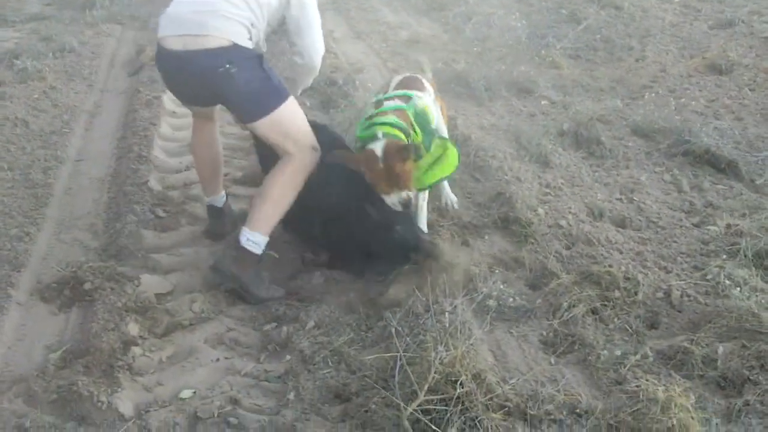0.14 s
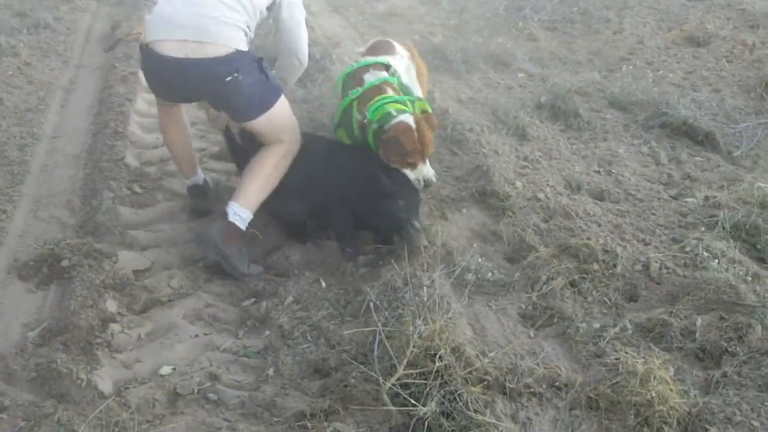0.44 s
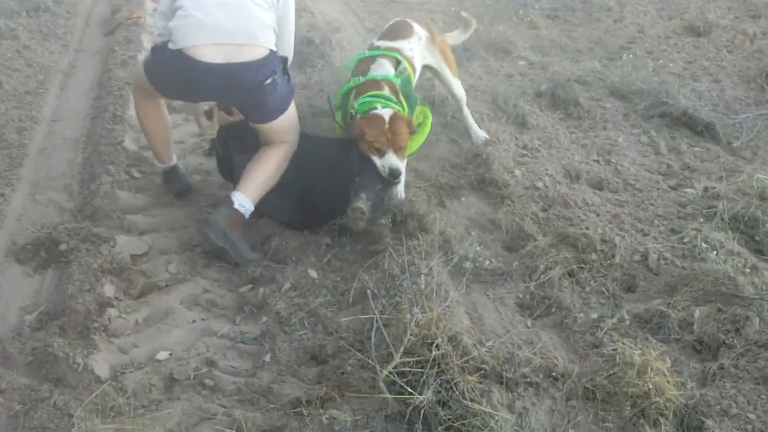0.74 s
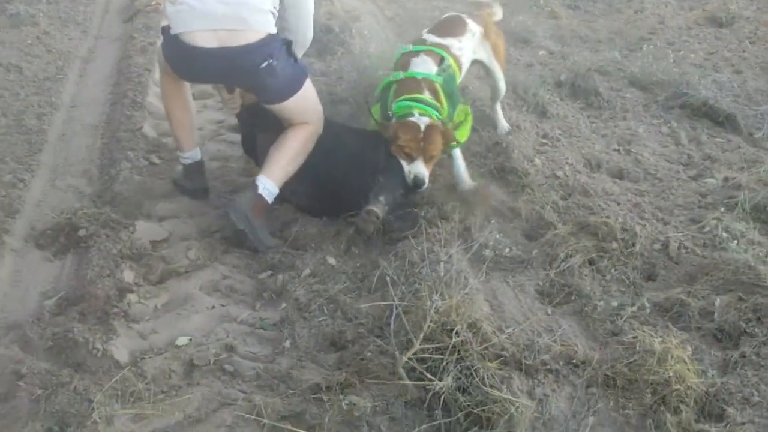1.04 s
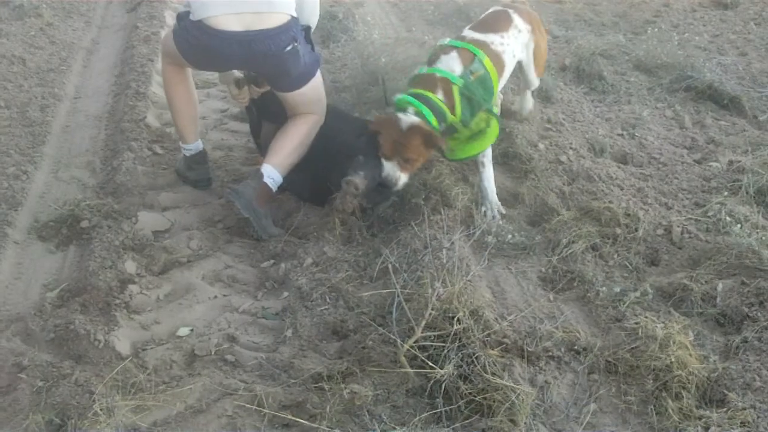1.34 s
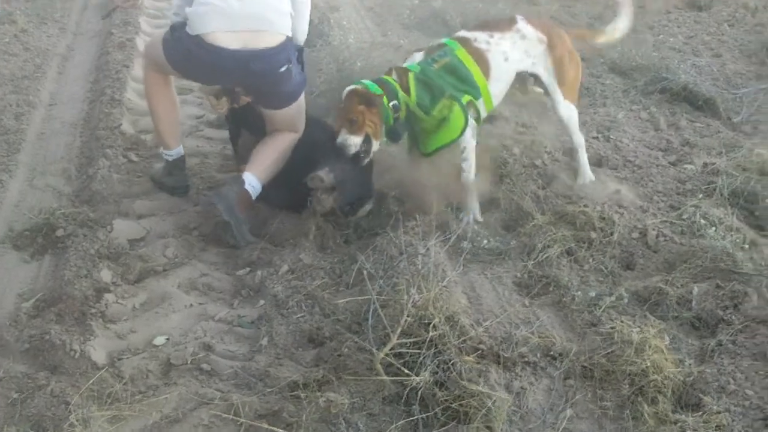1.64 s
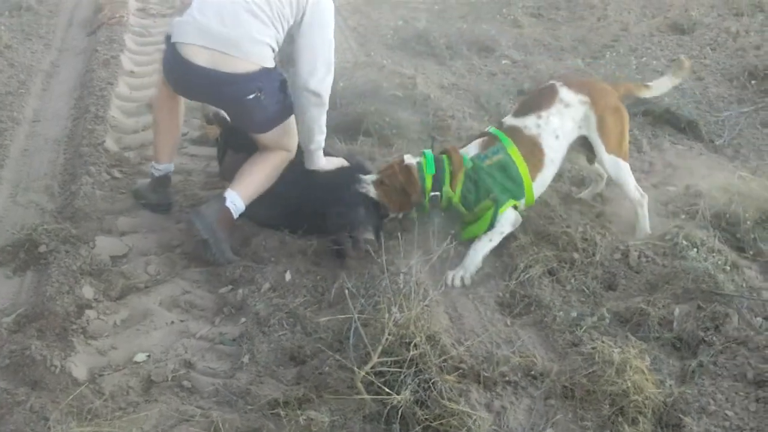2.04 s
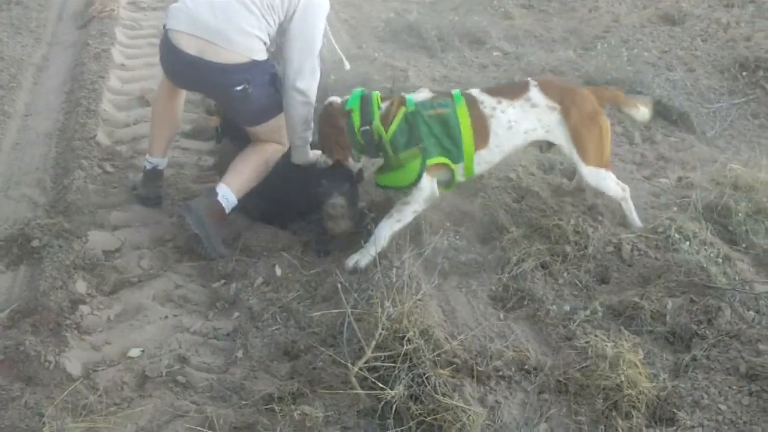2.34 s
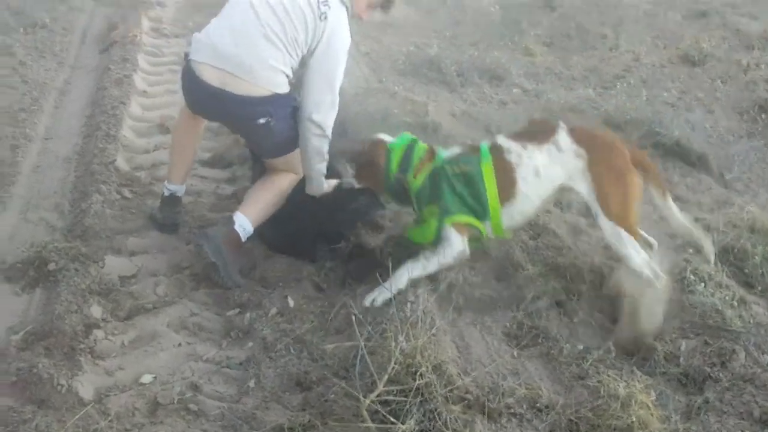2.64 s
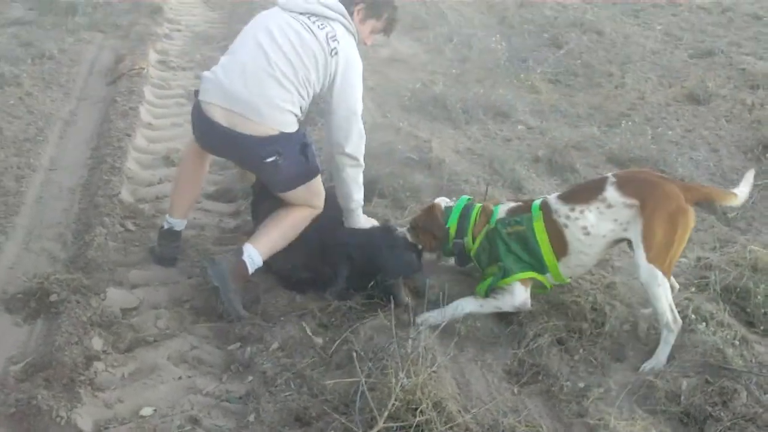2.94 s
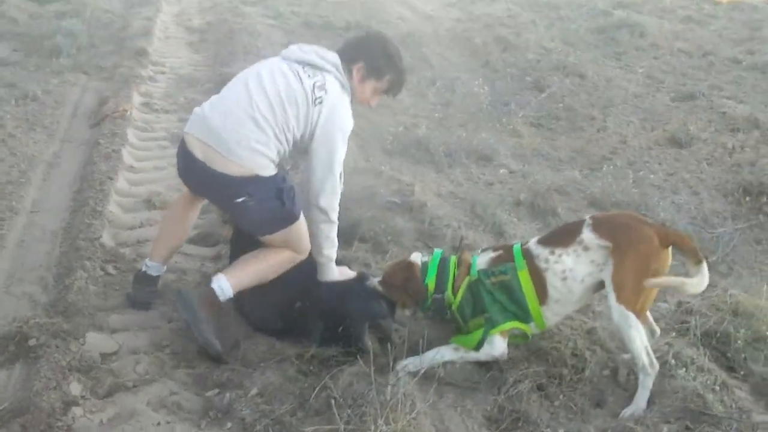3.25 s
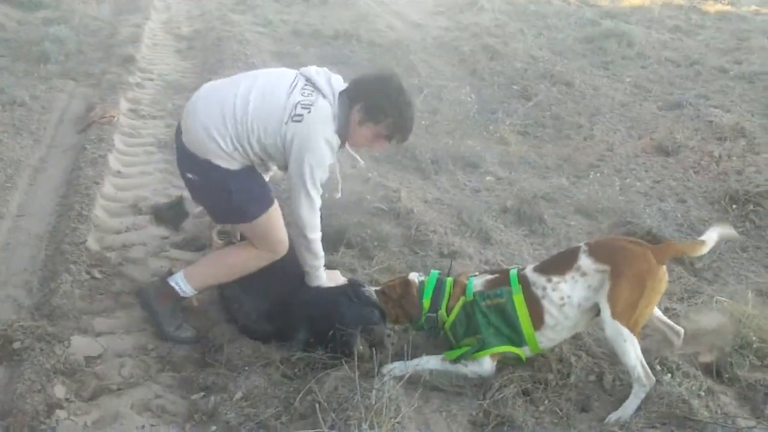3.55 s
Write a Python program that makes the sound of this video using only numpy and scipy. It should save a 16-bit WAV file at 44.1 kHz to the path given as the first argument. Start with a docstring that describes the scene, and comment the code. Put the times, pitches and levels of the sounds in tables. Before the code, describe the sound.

A pig squeals twice, loud and close, in a quiet open field. Feet briefly scuff dry grass at the start. At 0.2 seconds the first cry climbs quickly to a shrill, raspy pitch, holds, and drops away at 1.5. Faint scrapes on soil fill the pause. The second squeal runs from about 2 to 3.5 seconds, rising, wavering and falling at the end. Both cries echo faintly.

```python
"""Feet scuff dry grass, then a pig held down in an open field squeals twice, close to the microphone.
Two things vibrate in its throat at once: a high whistle and the slower vocal folds, which chop it
into sidebands and puffs of breath noise. The ground reflects the voice as the head moves.
Dull scrapes on soil follow each cry, and the field echoes faintly over quiet outdoor air."""
import sys
import numpy as np
from scipy import signal
from scipy.fft import rfft, irfft, next_fast_len
from scipy.io import wavfile
from scipy.ndimage import uniform_filter1d, minimum_filter1d, map_coordinates

SR = 44100
rng = np.random.default_rng(int(sys.argv[2]) if len(sys.argv) > 2 else 0)


def transcribe(u):
    """Save the signal u as a 16-bit wav file named by the first command-line argument.

    u: samples, shape (n,) or (channels, n), limited to [-1, 1]; the rate is SR.
    q: integer samples, one column per channel.
    """
    v = np.clip(np.atleast_2d(u).T, -1, 1)
    q = np.round(v * 32767).astype(np.int16)
    wavfile.write(sys.argv[1], SR, q)


N = 163170
T = np.arange(N) / SR


def amp(db):
    return 10 ** (np.asarray(db) / 20)


def unit(x):
    return x / np.sqrt(np.mean(x ** 2) + 1e-20)


def along(points, hz):
    """Read (frequency, value) points on a log axis."""
    freqs, values = np.transpose(points)
    return np.interp(np.log(hz + 1), np.log(freqs + 1), values)


def curves(rows):
    """One value per sample for each column after the time."""
    times, *columns = np.transpose(rows)
    return [np.interp(T, times, column) for column in columns]


def wobble(rate):
    """A smooth random curve, rate knots a second."""
    return map_coordinates(rng.standard_normal(int(N * 2000 / SR)), [T * rate])


def filtered(x, response):
    """Apply a gain that depends on frequency."""
    size = next_fast_len(N + SR // 2)
    return irfft(rfft(x, size) * response(np.fft.rfftfreq(size, 1 / SR)), size)[..., :N]


def highpass(x, edge_hz):
    return filtered(x, lambda hz: 1 / (1 + (edge_hz / (hz + 1)) ** 10))


def coloured(x, spectrum):
    return unit(filtered(x, lambda hz: amp(along(spectrum, hz))))


def phasor(hz):
    return np.exp(2j * np.pi * np.cumsum(hz) / SR)


def harmonics(tone, fall_db, count):
    return sum(amp(fall_db * k) * tone ** (k + 1) for k in range(count))


def phase_blur(radians):
    return np.exp(1j * radians * wobble(350))


# Open field, all around the microphone: (frequency [Hz], relative level [dB])
AIR_SPECTRUM = [(35, -50.5), (60, -12.5), (196, 7), (624, -27), (769, -5.5), (904, -15.5), (2130, -12),
                (3550, -19), (15300, -27.5)]
def field_air():
    """Quiet outdoor air, its level wavering."""
    return amp(-64.5 + 3.3 * wobble(4.7)) * coloured(rng.standard_normal(N), AIR_SPECTRUM)


# The field farther off, then grass and bodies close by: (frequency [Hz], time to fall 60 dB [s])
FAR_DECAY = [(500, .5), (2200, 0.5), (5000, 0.3), (12000, 0.12)]
NEAR_DECAY = [(500, 0.1), (3000, 0.28), (6000, 0.11), (12000, 0.12)]
def echo(x, decay):
    """Scattered answer of the surroundings, each frequency dying at its own speed."""
    hz, t, noise = signal.stft(rng.standard_normal(SR), SR, nperseg=256)
    tail = signal.istft(noise * amp(-60 * t / along(decay, hz)[:, None]), SR, nperseg=256)[1]
    return signal.fftconvolve(x, tail / np.linalg.norm(tail))[:N]


# Feet in dry grass and on soil: (time [s], length [s], level [dB])
GRASS_SCUFFS = [(0, 0.093, -42.5), (0.056, 0.061, -44.5), (0.1, 0.011, -46), (0.105, 0.076, -48.5),
                (0.162, 0.08, -39.5)]
SOIL_SCUFFS = [(1.748, 0.038, -59.5), (1.885, .02, -63.5), (3.59, 0.022, -74)]
# Colour of each surface: (frequency [Hz], relative level [dB])
GRASS_SPECTRUM = [(71, -53), (120, 8), (580, -10.5), (981, -6.5), (1150, 2.5), (1500, -5), (2800, 3),
                  (5570, -4.5), (15000, -21.5)]
SOIL_SPECTRUM = [(240, -57), (400, -29), (1120, 2), (1780, -5), (3970, -24), (8000, -47), (10400, -77),
                 (17600, -120)]
def feet(scuffs, surface):
    """Crackly scrapes underfoot, each swelling and fading."""
    swell = sum(amp(db) * np.sin(np.pi * np.clip((T - start) / length, 0, 1)) ** 0.7
                for start, length, db in scuffs)
    crackle = amp(2.2 * wobble(340)) * rng.standard_normal(N)
    return swell * coloured(crackle, surface)


# Ground between pig and microphone: (time [s], notch spacing [Hz], reflection [dB, capped at 0])
GROUND_PATH = [(.2, 2000, -28.5), (.34, 1944, -13.5), (.41, 2962, -1.5), (.55, 3800, -18.5), (.62, 5130, 7),
               (.72, 7010, 1.5), (.9, 5580, -19), (1.35, 7260, 2), (2.0, 1600, -23.5), (2.06, 2160, 2),
               (2.13, 3574, -1), (2.2, 5000, -7), (2.28, 4400, -17), (2.38, 4730, -19.5), (2.55, 6450, -3),
               (2.65, 6144, -2.5), (2.78, 5890, -7.5), (2.87, 4670, 8.5), (2.93, 3260, -5.5),
               (3.15, 3200, 1.5), (3.35, 3240, -7.5)]
def ground_bounce(direct, scatter_hz=7070):
    """A late copy cuts notches that shift as the head moves; rough ground dulls that copy."""
    spacing_hz, ground_db = curves(GROUND_PATH)
    gain = amp(np.minimum(ground_db, 0))
    late = map_coordinates(direct, [np.arange(N) - SR / spacing_hz], order=3)
    late = filtered(late, lambda hz: 1 / (1 + (hz / scatter_hz) ** 2))
    return (direct + gain * late) / np.sqrt(1 + gain ** 2)


def puffs(folds, depth=0.19):
    """Breath noise gated by the vocal folds."""
    return (1 + depth * folds.real) * rng.standard_normal(N)


# Rasp at close range: (frequency [Hz], relative level [dB])
RASP_SPECTRUM = [(300, -59), (420, -34), (600, -9), (900, -11.5), (1250, -7.5), (1600, 11.5), (2300, 11.5),
                 (2800, 10.5), (3300, 4.5), (4200, -29)]
# Breath in the lowest throat resonance, per cry: (time [s], level [dB])
THROAT_LEVELS = [
    [(0.225, -21), (0.247, -23.5), (0.367, -44), (0.493, -46), (0.515, -38), (1.147, -45), (1.161, -41),
     (1.297, -48), (1.393, -36.5), (1.449, -48), (1.519, -41), (1.545, -76)],
    [(1.962, -36), (2.004, -34), (2.092, -57), (2.224, -68.5), (2.258, -41), (2.566, -51), (2.8, -41),
     (2.894, -53), (3.08, -37), (3.106, -45), (3.412, -39), (3.49, -68)],
]
def breath(index, folds, rough, rasp_db, throat_hz=913, width_hz=88):
    """Puffs make a broad rasp, thinner when the folds are steady, and ring the throat."""
    gain = amp(uniform_filter1d(rasp_db, size=2000)) * np.sqrt(2200 / 75)
    rasp = gain * np.clip(rough / .2, .35, 1) * coloured(puffs(folds), RASP_SPECTRUM)
    ring = unit(filtered(puffs(folds), lambda hz: 1 / (1 + ((hz - throat_hz) / width_hz) ** 2)))
    return rasp + amp(curves(THROAT_LEVELS[index])[0]) * ring


# Colour of the open mouth: (frequency [Hz], relative level [dB])
MOUTH_SPECTRUM = [(1880, -51.5), (3200, 5), (3900, 5.5), (4400, 8), (5050, 12), (5700, 2), (6400, 0),
                  (7600, -12.5), (9000, -19), (9700, -19.5), (10300, -24.5), (12100, -31.5), (15300, -48.5)]
# Treble at the mouth, per cry: (time [s], level [dB] of each of four bands, low to high)
TREBLE_LEVELS = [
    [(0.225, -39.5, -54, -35.5, -27.5), (0.243, -47, -40, -57.5, -47.5),
     (0.261, -21.5, -23.5, -35.5, -37.5), (0.319, -24, -20.5, -33, -20), (0.353, -30.5, -32, -34, -28),
     (0.375, -39, -48, -25.5, -34.5), (0.463, -39.5, -49.5, -43.5, -35.5),
     (0.497, -33.5, -39.5, -39.5, -32), (0.573, -46.5, -37.5, -44.5, -32), (0.635, -36, -36.5, -33.5, -27),
     (0.687, -33, -36, -38, -35), (0.809, -33, -32, -38.5, -33), (0.905, -34.5, -39, -36, -38),
     (1.085, -52, -29.5, -39, -35), (1.257, -41.5, -25.5, -55, -36.5), (1.341, -17.5, -33.5, -38.5, -38),
     (1.401, -24, -30.5, -53, -31), (1.475, -32, -28.5, -47.5, -36), (1.507, -23.5, -38, -39, -35.5),
     (1.541, -37.5, -82, -68, -60), (1.545, -54.5, -59, -57.5, -46.5)],
    [(1.962, -61, -61, -35, -56.5), (1.974, -46, -38, -45, -38.5), (1.998, -28, -35, -28, -34),
     (2.032, -29.5, -42, -22, -31), (2.058, -30, -34.5, -28, -30.5), (2.088, -29, -55, -33, -38),
     (2.12, -31.5, -52, -34.5, -31.5), (2.146, -25, -51, -34, -30.5), (2.218, -20.5, -32.5, -30.5, -37.5),
     (2.246, -39, -23.5, -27.5, -31), (2.368, -35.5, -49, -28, -36.5), (2.452, -31, -62, -29.5, -30.5),
     (2.574, -35, -33, -41.5, -31), (2.772, -41, -38, -27.5, -33.5), (2.834, -33.5, -45.5, -42, -32),
     (3.028, -38, -24.5, -66, -31), (3.368, -55, -25.5, -36.5, -36.5), (3.398, -23, -41, -34, -35.5),
     (3.418, -38.5, -54, -41, -50.5), (3.452, -42.5, -56, -53, -47.5), (3.47, -80, -50, -73, -79)],
]
def mouth_treble(index, whistle, pulses, folds, rough, edges_hz=(4500, 5800, 8000)):
    """Pulsed overtones of the whistle, blurred by unsteady folds and mixed with hiss."""
    blur = phase_blur((2.4, 3.2)[index] * rough)
    overtones = unit((pulses * whistle * harmonics(whistle, fall_db=-3.2, count=4) * blur).real)
    hiss = amp(-2) * (.5 + rough) * unit(puffs(folds))
    bright = amp(-4) * (1 - 0.12 * rough) * overtones + hiss
    bright = filtered(bright, lambda hz: amp(along(MOUTH_SPECTRUM, hz)))
    above = [bright] + [highpass(bright, edge) for edge in edges_hz] + [0]
    treble = 0
    for k, db in enumerate(curves(TREBLE_LEVELS[index])):
        band = above[k] - above[k + 1]
        running_rms = np.sqrt(np.abs(uniform_filter1d(band ** 2, size=4000)) + 1e-20)
        treble += amp(db) * band / running_rms
    return treble


# In the throat: (time [s], unsteadiness of the folds [0-1])
FOLD_ROUGHNESS = [(.22, .9), (.3, 0.79), (.34, .4), (.4, 0.38), (.415, 0.05), (.445, 0.04), (.46, 0.29),
                  (.53, 0.28), (.56, .6), (.6, 0.1), (.64, 0.1), (.66, .35), (.7, .5), (1.05, 0.49),
                  (1.1, 0.33), (1.25, 0.29), (1.35, .7), (1.47, 0.61), (1.5, .22), (1.55, .12), (1.96, 0.5),
                  (2.1, .45), (2.2, .5), (2.25, .5), (2.56, 0.45), (2.58, .07), (2.645, .07), (2.68, 0.4),
                  (2.88, .3), (2.98, 0.25), (3.05, .6), (3.36, .6), (3.39, .22), (3.5, 0.4)]
def larynx(whistle_hz, fold_hz, whistle_wander_hz=24.07, fold_wander_hz=88.75):
    """Two wandering vibrations: gives the whistle, a tone at half the fold rate, and unsteadiness."""
    rough = curves(FOLD_ROUGHNESS)[0]
    whistle = phasor(whistle_hz + whistle_wander_hz * (.5 + rough) * (.25 * wobble(60) + wobble(250)))
    half = phasor((fold_hz + fold_wander_hz * rough * (.25 * wobble(70) + wobble(350))) / 2)
    return whistle, half, rough


# Every other fold beat is weaker, adding tones halfway between sidebands: (time [s], level [dB])
HALF_RATE_LEVELS = [(.22, -57.5), (.5, -46.5), (.56, -31), (.64, -30), (.67, -42), (1.2, -39), (1.32, -35),
                    (1.47, -37), (1.5, -62.5), (2, -58.5), (2.2, -47.5), (2.3, -39), (2.45, -40.5),
                    (2.575, -33), (2.65, -33), (2.69, -40), (2.9, -44.5), (3.05, -31.5), (3.35, -32.5),
                    (3.39, -58.5)]
# The pig, close to the microphone, per cry: (time [s], whistle [Hz], folds [Hz], whistle [dB],
# upper sideband [dB], lower sideband [dB], folds [dB], rasp [relative dB])
SQUEALS = [
    [(0.225, 754, 401.4, -30, -29.5, -33, -78, -43), (0.24, 907, 414, -28.5, -24.5, -51, -29, -42),
     (0.26, 1112, 394.9, -18, -15.5, -19, -53, -32.5), (0.28, 1347, 489.5, -14, -29.5, -29.5, -38, -26),
     (0.31, 1707, 497.1, -12, -32, -26.5, -45, -30), (0.33, 1813, 532.6, -14, -12, -28.5, -37, -43.5),
     (0.36, 1875, 577.9, -15, -11, -35, -43.5, -31), (0.39, 1974, 561.8, -26, -18, -36, -50, -37),
     (0.415, 2100, 533.2, -28.5, -18.5, -25, -46.5, -62),
     (0.44, 2121, 532.3, -23.5, -30, -30.5, -46, -42.5), (0.47, 2161, 551.1, -25.5, -23.5, -30, -41.5, -44),
     (0.5, 2226, 573.3, -19, -24.5, -26, -42.5, -48.5), (0.54, 2217, 645.6, -22, -28, -25.5, -32.5, -30),
     (0.58, 2181, 614, -17, -17.5, -25.5, -40.5, -41), (0.63, 2199, 613.3, -16, -24, -29.5, -43.5, -43.5),
     (0.67, 2211, 616.2, -20, -18, -40.5, -46.5, -38.5),
     (0.7, 2226, 667.5, -18.5, -20.5, -45.5, -43, -41.5),
     (0.74, 2151, 602.7, -24.5, -17.5, -57, -51.5, -44), (0.8, 2211, 635.5, -20.5, -25, -41.5, -51, -43),
     (0.87, 2208, 633.8, -21, -25.5, -43, -53.5, -44.5), (0.94, 2193, 620, -20.5, -23, -44, -53, -44),
     (1, 2235, 624.3, -20.5, -26, -44.5, -60, -41.5), (1.06, 2246, 585.3, -20.5, -24, -34, -58.5, -51.5),
     (1.12, 2235, 555, -20, -24, -37, -56.5, -48.5), (1.2, 2209, 555, -23.5, -21.5, -41, -56, -51),
     (1.28, 2182, 484.2, -24, -21.5, -50, -60, -48.5), (1.36, 2204, 511.3, -19.5, -29, -51, -61, -43),
     (1.43, 2170, 542.2, -23, -28.5, -36, -59, -40), (1.48, 2151, 532.7, -27.5, -24.5, -46, -69, -39.5),
     (1.5, 1945, 512, -26, -35, -48, -58.5, -40), (1.52, 1814, 496, -28.5, -83.5, -37.5, -64, -42),
     (1.545, 1565, 474, -44.5, -43, -107, -69, -59.5)],
    [(1.962, 1088, 438.4, -49.5, -44.5, -65, -95, -63), (1.975, 1218, 378.8, -27, -32.5, -39, -74, -37.5),
     (2, 1444, 427.1, -20, -29, -39, -69, -40), (2.025, 1652, 457, -20, -23.5, -25, -41.5, -52.5),
     (2.05, 1840, 514.6, -23, -23.5, -39, -45, -50.5), (2.08, 1960, 456.5, -28, -29, -28.5, -53, -51),
     (2.12, 1966, 440.7, -30, -24.5, -29, -50, -43.5), (2.155, 1957, 486.5, -29.5, -23.5, -27, -51, -47.5),
     (2.18, 1876, 468.8, -22, -25.5, -29.5, -49, -44), (2.21, 1892, 470.1, -27.5, -18.5, -28, -53, -47),
     (2.24, 2016, 494.1, -21, -19.5, -33, -49, -36), (2.28, 1972, 560.6, -28, -21, -48, -56.5, -39.5),
     (2.33, 1956, 547.2, -25, -26, -44, -62, -43.5), (2.4, 2025, 601.4, -25.5, -31, -42.5, -59.5, -44),
     (2.47, 2048, 575.1, -32.5, -28.5, -37, -54, -42), (2.53, 2096, 601.7, -30.5, -26, -42.5, -56.5, -42.5),
     (2.6, 2044, 592.4, -27.5, -27, -43, -52.5, -41.5), (2.67, 2022, 597, -31, -26.5, -42, -54, -40.5),
     (2.74, 2036, 603, -33, -24, -39.5, -51, -41), (2.81, 2089, 596.7, -29.5, -22, -35, -51, -45),
     (2.87, 2126, 537.8, -26.5, -23.5, -33.5, -54, -34.5),
     (2.94, 2118, 504.5, -25.5, -21, -25.5, -50, -58.5), (3, 2152, 547, -23, -17.5, -29, -48, -44.5),
     (3.05, 2143, 496.6, -16.5, -20, -41, -51.5, -40.5), (3.12, 2178, 553.7, -20, -18, -80, -49, -45.5),
     (3.2, 2184, 556.7, -20, -20.5, -57, -44.5, -49.5), (3.28, 2165, 507, -19, -19, -77, -53.5, -42),
     (3.36, 2207, 520, -22, -21.5, -31.5, -51.5, -43), (3.385, 1993, 463.7, -22, -20, -38, -53, -40.5),
     (3.41, 1691, 452.6, -27.5, -48, -49.5, -49.5, -45), (3.44, 1570, 455.5, -52, -33.5, -48, -88, -49),
     (3.47, 1468, 442, -64, -65, -52, -74, -59.5)],
]
def squeal(index, attack_s=.004, mouth_open_s=.012, shimmer_db=0.5):
    """The folds chop the whistle into sidebands; gives the body and the treble of one cry."""
    whistle_hz, fold_hz, whistle_db, upper_db, lower_db, fold_db, rasp_db = curves(SQUEALS[index])
    whistle, half, rough = larynx(whistle_hz, fold_hz)
    folds = half ** 2
    half_gain = amp(curves(HALF_RATE_LEVELS)[0])
    shimmer = lambda: amp(shimmer_db * rough * wobble(200))

    # A conjugate puts its tones below the whistle.
    upper = amp(upper_db) * phase_blur(1.3 * rough) * harmonics(folds, fall_db=-15.5, count=2)
    lower = amp(lower_db) * shimmer() * np.conj(harmonics(folds, fall_db=-17.5, count=2))
    halfway = half + amp(-11) * half ** 3
    chop = amp(whistle_db) + upper + lower + half_gain * (halfway + amp(-6) * np.conj(halfway))
    buzz = amp(fold_db) * harmonics(folds, fall_db=-1.5, count=3)
    growl = half_gain * amp(-29.5) * (half + 3 * half ** 3)
    tones = np.sqrt(2) * (whistle * chop * shimmer() + buzz + growl).real
    body = tones + breath(index, folds, rough, rasp_db)

    # The stronger the upper sideband, the harder the overtones pulse.
    depth = np.clip(amp(upper_db - whistle_db - 8.5), 0, 1)
    half_share = half_gain / (amp(whistle_db) + half_gain)
    pulses = 1 + depth * (3.55 * harmonics(folds, fall_db=-10, count=3) + half_share * half).real
    treble = mouth_treble(index, whistle, pulses, folds, rough)

    start, end = SQUEALS[index][0][0], THROAT_LEVELS[index][-1][0]
    gate = np.clip(np.minimum(T - start + 0.00052, end + attack_s - T) / attack_s, 0, 1)
    opening = np.clip((T - start) / mouth_open_s, 0, 1) ** 2
    return gate * body, gate * opening * treble


def pig():
    """Both cries; the treble reaches the microphone once more off the ground."""
    body, treble = np.sum([squeal(0), squeal(1)], axis=0)
    return body + ground_bounce(treble)


def scene():
    """Pig, feet and field at centre; a faint, slightly delayed copy above 5 kHz differs between the two
    channels."""
    voice = pig()
    air = field_air()
    echoes = amp(-27.5) * echo(voice, FAR_DECAY) + amp(-42) * echo(voice, NEAR_DECAY)
    scuffs = feet(GRASS_SCUFFS, GRASS_SPECTRUM) + feet(SOIL_SCUFFS, SOIL_SPECTRUM)
    mid = air + echoes + scuffs + voice
    side = amp(-59.5) * highpass(np.roll(mid, 40), edge_hz=5000)
    return np.array([mid + side, mid - side])


def record(dry, ceiling=.69, limiter_s=.004, wind_cut_hz=400, top_hz=15300):
    """Microphone chain: fast limiter, inverted polarity, wind filter and band limit."""
    span = round(limiter_s * SR)
    needed_gain = np.minimum(1, ceiling / (np.abs(dry).max(axis=0) + 1e-9))
    gain = uniform_filter1d(minimum_filter1d(needed_gain, size=2 * span), size=span)
    bass_leak = lambda hz: amp(-21) * hz ** 2 / (hz ** 2 + 130 ** 2)
    wind_filter = lambda hz: bass_leak(hz) + 1 / (1 + (wind_cut_hz / (hz + 1)) ** 12)
    return filtered(-gain * dry, lambda hz: wind_filter(hz) * (hz < top_hz))


dry = scene()
out = record(dry)
transcribe(out)
```